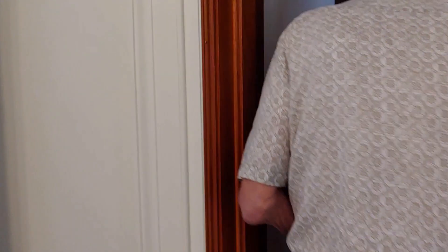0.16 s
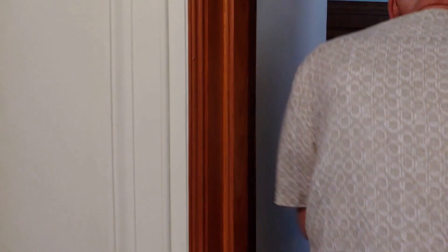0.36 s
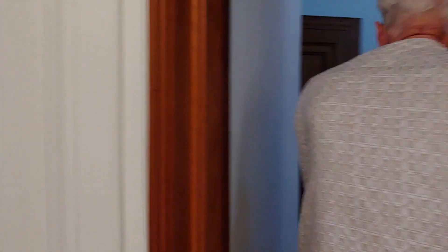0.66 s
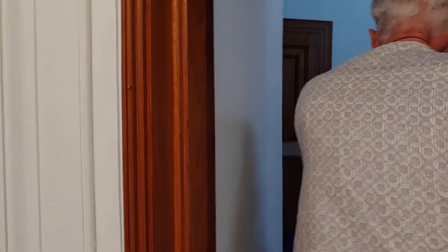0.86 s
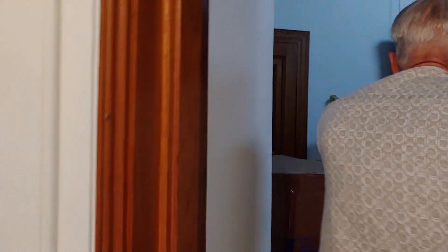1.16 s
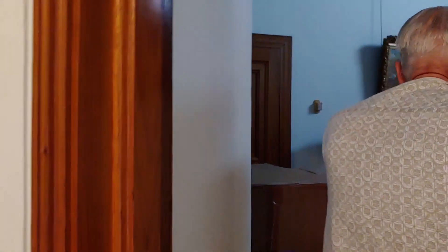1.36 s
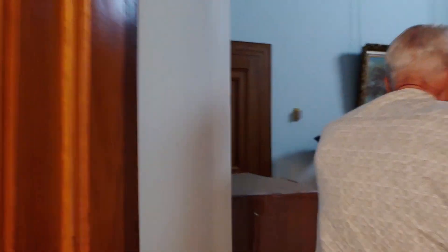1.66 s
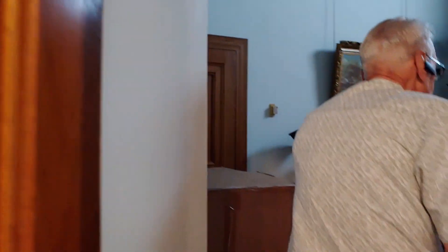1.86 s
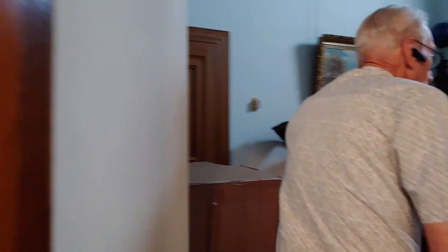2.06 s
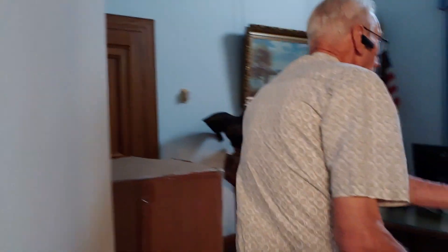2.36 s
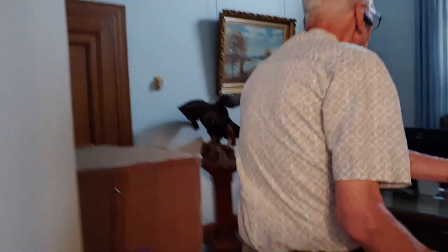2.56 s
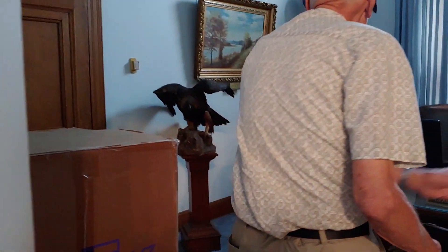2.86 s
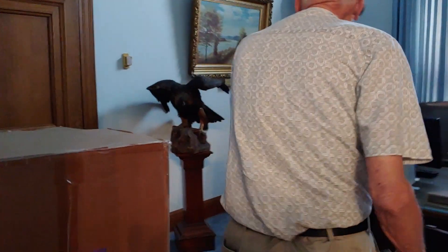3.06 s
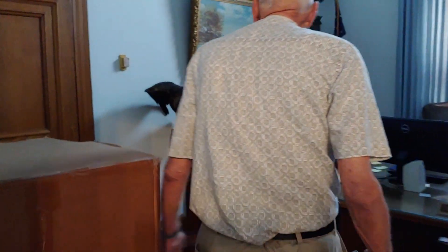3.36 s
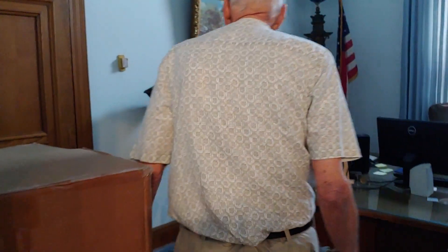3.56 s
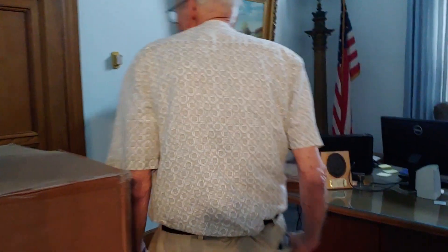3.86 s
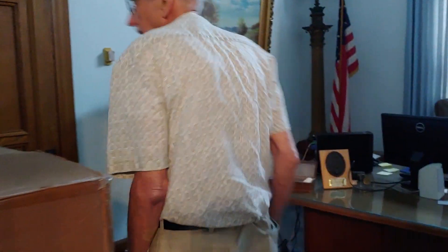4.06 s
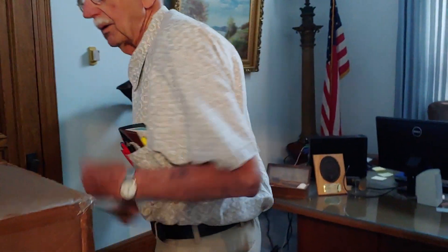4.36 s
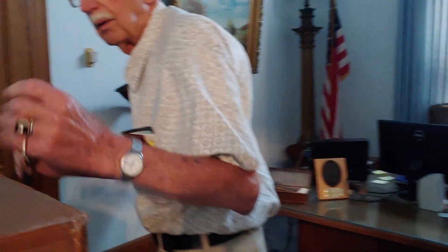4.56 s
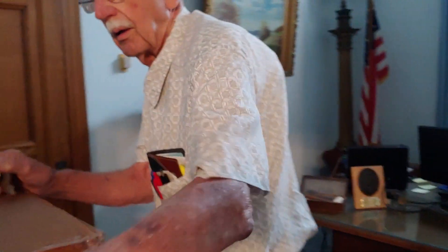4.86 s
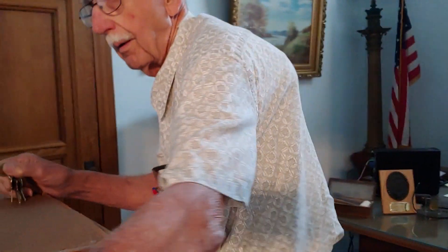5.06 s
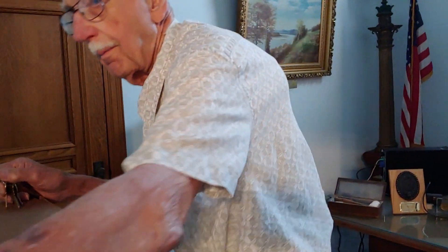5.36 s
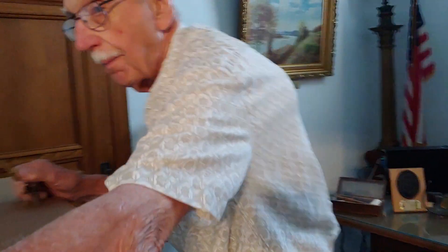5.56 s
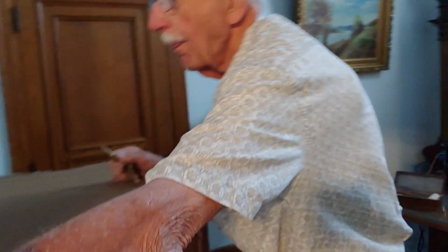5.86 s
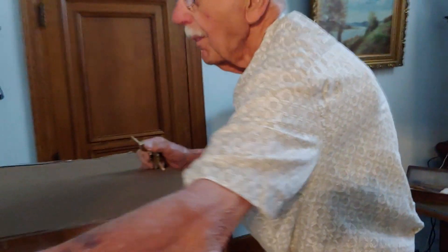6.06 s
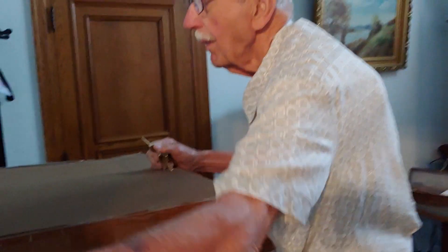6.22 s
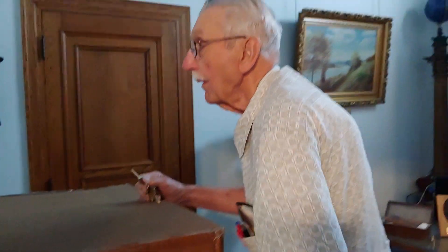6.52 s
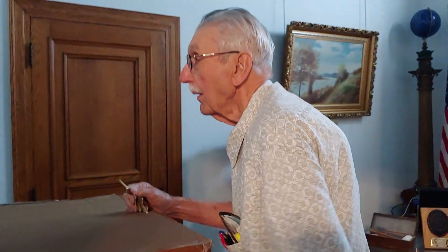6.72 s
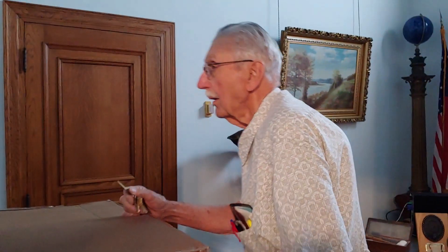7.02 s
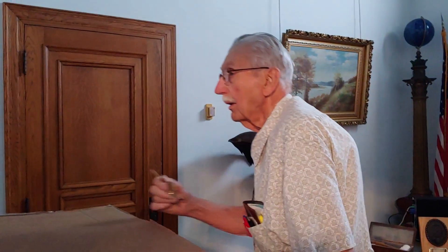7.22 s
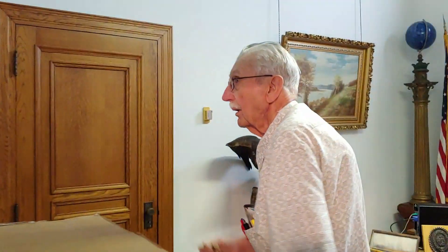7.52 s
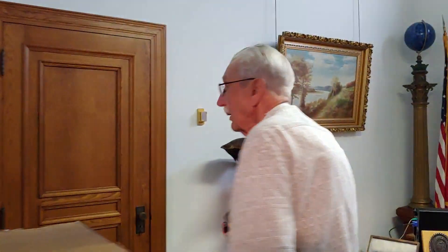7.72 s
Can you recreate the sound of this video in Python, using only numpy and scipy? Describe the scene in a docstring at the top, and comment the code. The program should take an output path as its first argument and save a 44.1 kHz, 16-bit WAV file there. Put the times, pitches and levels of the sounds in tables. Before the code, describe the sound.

Close hand-held microphone in a moderately live office. Cloth brushing, dull footfalls and a sharp clack come over low handling rumble. A panel bump leads to a loud wooden knock with scraping and key clinks. After quieter steps and a few jingles, the keys land on a cardboard box with a hollow thump and bright clatter. Small taps follow, then a metal snap and chatter, a faint squeak, and light final clinks.

```python
"""Soft brushing and light knocks come first, over low room noise and the rumble of a hand-held microphone.
Someone walks through a doorway into an office with a ring of keys, and sets it down on a cardboard box.
Footfalls and knocks are shaped noise bursts with a sung tone; cloth, hands and scrapes are grains of friction.
Door hardware, panel, furniture, box and keys ring in tables of decaying modes; a faint squeak comes late.
Diffuse reflections of the contacts, strokes and keys fill the room."""
import sys
import numpy as np
from scipy import signal
from scipy.fft import rfft, irfft, next_fast_len
from scipy.io import wavfile
from scipy.ndimage import uniform_filter1d

SR = 44100
rng = np.random.default_rng(int(sys.argv[2]) if len(sys.argv) > 2 else 0)


def transcribe(signal):
    """Save signal, clipped to [-1, 1], as a 16-bit WAV file at the path in sys.argv[1]."""
    frames = np.atleast_2d(signal).T
    limited = np.clip(frames, -1, 1)
    pcm = np.round(limited * 32767).astype(np.int16)
    wavfile.write(sys.argv[1], SR, pcm)


N = 347814


def from_db(db):
    """Decibels to gain."""
    return 10 ** (np.asarray(db) / 20)


def rms_one(x):
    """Scale to unit rms."""
    return x / np.sqrt(np.mean(x ** 2) + 1e-20)


def in_time(rows):
    """Interpolate each column of a curve, sample by sample."""
    times_s, *columns = np.transpose(rows)
    return [np.interp(np.arange(N) / SR, times_s, column) for column in columns]


def at_hz(points, hz):
    """Read a table on a log-frequency axis."""
    points_hz, values = np.transpose(points)
    return np.interp(np.log(np.maximum(hz, 1)), np.log(points_hz), values)


def band(x, edges_hz, kind, order=2):
    """Butterworth filter."""
    return signal.sosfilt(signal.butter(order, edges_hz, kind, fs=SR, output="sos"), x)


def add(out, start_s, sound):
    """Mix a sound in from start_s, clipped to the scene."""
    start = round(start_s * SR)
    sound = sound[max(-start, 0):max(N - start, 0)]
    out[max(start, 0):max(start, 0) + len(sound)] += sound


def ring(clicks, hz, t60_s):
    """Two-pole resonator: a unit click sets a sine of height 1 ringing."""
    radius = from_db(-60 / (t60_s * SR))
    angle = 2 * np.pi * hz / SR
    poles = [1, -2 * radius * np.cos(angle), radius * radius]
    return signal.lfilter([0, np.sin(angle)], poles, clicks + 1e-18)


def surges(depth_db, rate_hz):
    """A gain that swells and sinks at random: lowpassed noise, depth_db rms."""
    drift = band(rng.standard_normal(N + SR), rate_hz, "low")[SR:]
    return from_db(depth_db * rms_one(drift))


def struck(blows, modes, detune=0.0, uneven_db=4.5, attack_s=0.00027):
    """Every blow rings all modes of one object; strengths vary per blow, loose parts shift their tuning."""
    out = np.zeros(N)
    t = np.arange(int(.3 * SR)) / SR
    hz, mode_db, t60_s = np.transpose(modes)
    decays = from_db(-60 * t / t60_s[:, None]) * (1 - np.exp(-t / attack_s))
    for start_s, db in blows:
        strengths = from_db(db + mode_db + uneven_db * rng.standard_normal(len(hz)))
        tuned_hz = hz * (1 + detune * rng.standard_normal(len(hz)))
        cycles = tuned_hz[:, None] * t + rng.random((len(hz), 1))
        add(out, start_s, strengths @ (decays * np.sin(2 * np.pi * cycles)))
    return out


# Edges of the bass, middle, presence and treble bands [Hz].
BAND_EDGES_HZ = [180, 700, 2500, 7000, 13000]
PIVOT_HZ = 2000


def band_centres_hz():
    """Geometric centres of the four bands."""
    edges = np.array(BAND_EDGES_HZ)
    return np.sqrt(edges[1:] * edges[:-1])


def band_levels(spectrum_db, db, tilt_db):
    """The spectrum of a contact's kind, tilted about the pivot: a harder contact is brighter."""
    return db + np.array(spectrum_db) + tilt_db * np.log2(band_centres_hz() / PIVOT_HZ)


def colour(x, levels_db, top_db, ring_hz, ring_db, ring_q=3.9, near_db=-3.0, near_s=.009, count=7):
    """Causal filter: four band levels, one resonance, and the comb of echoes from surfaces close by."""
    size = 2 * next_fast_len(len(x) // 2 + 1024)
    hz = np.arange(size // 2 + 1) * SR / size
    density = np.array(levels_db) - 10 * np.log10(2 * np.diff(BAND_EDGES_HZ) / SR)
    # a sound that is already dulling keeps falling towards the top
    top = density[-1] + 1.6 * min(density[-1] - density[-2] + 6, 3)
    points = [(60, density[0] - 14), (170, density[0] - 3), *zip(band_centres_hz(), density),
              (11900, top - 3.5), (13200, top + top_db), (16000, top + top_db - 9.5)]
    plain_db = at_hz(points, hz)
    # the ring gathers the energy of its neighbourhood into a narrow peak
    octaves = np.log2(np.maximum(hz, 1) / ring_hz)
    peak = 1 / (1 + (2 * ring_q * (hz / ring_hz - 1)) ** 2)
    lift = peak - 0.34 * np.exp(-(octaves / 5.5) ** 2)
    # folding the cepstrum gives minimum phase
    cepstrum = irfft(np.log(from_db(plain_db + ring_db * lift)))
    cepstrum[1:size // 2] *= 2
    cepstrum[size // 2 + 1:] = 0
    # echoes are drawn anew for each contact, the latest at near_s
    lags_s = near_s * rng.uniform(.08, 1, count)
    strengths = from_db(near_db) * rng.choice([-1, 1], count) * np.exp(-lags_s / near_s)
    echoes = np.zeros(size)
    echoes[np.round(lags_s * SR).astype(int)] = strengths
    # long waves bend round small surfaces
    reflected = hz / (hz + 250)
    comb = (1 + reflected * rfft(echoes)) / np.sqrt(1 + reflected ** 2 * np.sum(strengths ** 2))
    return irfft(rfft(x, size) * np.exp(rfft(cepstrum)) * comb)


# Noise spectrum of the room air. Each row: frequency in Hz, relative density in dB.
AIR_SPECTRUM = [(60, 10), (150, 10.5), (300, 5), (700, 1), (1500, -3), (3500, -6.5), (8000, -8),
                (11500, -13), (13500, -21.5), (16000, -26)]
# Stir of the background. Each row: time in seconds, rms level in dB.
AIR_LEVEL = [(0, -52), (1.3, -49), (1.62, -55.5), (1.95, -47.5), (2.65, -48.5), (3.1, -52.5), (3.6, -51),
             (4.5, -54), (5.3, -46), (5.85, -58), (6.45, -53.5), (6.88, -54), (7.0, -54), (7.49, -59),
             (7.54, -40.5), (7.89, -41.5)]


def air(near_db=-5.5, count=8):
    """Soft noise of the room, rippled by reflections."""
    hz = np.arange(N // 2 + 1) * SR / N
    lags_s = rng.uniform(.002, .02, count)
    ripple = 1 + from_db(near_db) * sum(np.exp(-2j * np.pi * hz * lag) for lag in lags_s)
    spectrum = rfft(rng.standard_normal(N)) * from_db(at_hz(AIR_SPECTRUM, hz)) * ripple
    return from_db(in_time(AIR_LEVEL)[0]) * rms_one(irfft(spectrum, N))


# Reverberation of the office. Each row: frequency in Hz, t60 in seconds.
ROOM_T60 = [(150, .55), (1000, .52), (5000, .44), (8000, .32), (15000, .17)]


def office(x, first_s=0.00016, build_s=0.00024, count=10):
    """Diffuse reflections off plaster and wood: noise bands decay separately, the treble dies first."""
    t = np.arange(int(.7 * SR)) / SR
    edges_hz = np.geomspace(100, 17000, count + 1)
    tail = np.zeros(len(t))
    for low, high in zip(edges_hz, edges_hz[1:]):
        decay = from_db(-60 * t / at_hz(ROOM_T60, np.sqrt(low * high)))
        tail += band(rng.standard_normal(len(t)), [low, high], "band") * decay
    tail *= 1 - np.exp(-np.maximum(t - first_s, 0) / build_s)
    return signal.fftconvolve(x, tail / np.sqrt(np.sum(tail ** 2)))[:N]


def wobble(edges_hz, evenness):
    """A low, loosely tuned shaking whose swings are partly evened out."""
    shake = band(rng.standard_normal(N + SR), edges_hz, "band", order=3)
    swing = np.abs(signal.hilbert(shake, next_fast_len(len(shake))))[:len(shake)]
    even = shake / uniform_filter1d(swing, size=900) ** evenness
    return rms_one(band(even, 1.01 * edges_hz[1], "low", order=4)[SR:])


# Grip shifts on the microphone housing. Each row: start in seconds, relative level in dB.
BUMPS = [(.622, -9), (.68, -5), (.783, -0.5), (0.834, 5.5), (.964, 4), (1.072, -6), (1.095, 0), (1.168, 4),
         (1.309, 2.5), (1.461, -7), (1.556, -1)]
# Housing modes. Each row: nominal frequency in Hz, relative level in dB, t60 in seconds.
HOUSING_MODES = [(58.8, 0.5, 0.13), (126, -9.5, 0.065), (195, -18, 0.035)]
# Handling rumble. Each row: time in seconds, deep sway and upper shudder as relative levels in dB.
HANDLING = [(0.0, -49, -21.5), (0.07, -44, -20.5), (0.13, -40, -11.5), (0.17, -37, -11.5),
            (0.2, -21, -21.5), (0.31, -31.5, -38), (0.7, -7.5, -9.5), (0.74, -14, -13.5), (0.81, -8, -16),
            (1.38, -16.5, -12), (1.49, -10.5, -8), (1.95, -29.5, -40), (2.09, -25, -21), (2.17, -30.5, -32),
            (2.61, -28, -40), (2.7, -16, -30.5), (3.23, -37.5, -45.5), (3.4, -31.5, -28.5),
            (3.49, -17.5, -41), (3.62, -28, -35.5), (4.59, -29.5, -37), (4.7, -62, -38), (4.79, -31, -24.5),
            (4.92, -40, -37), (5.07, -31, -42), (5.27, -36, -39), (5.29, -17, -26), (5.34, -19, -41.5),
            (5.71, -15, -15), (5.95, -16, -42), (6.04, -28, -26.5), (6.41, -15, -26.5), (6.61, -27, -28.5),
            (6.68, -27, -15.5), (6.81, -15.5, -25.5), (7.07, -30.5, -24.5), (7.12, -74, -32.5),
            (7.18, -13.5, -44.5), (7.33, -26.5, -23), (7.6, -29, -36), (7.73, -31, -14.5), (7.89, -31, -34)]


def handling(sway_db=0.0, shudder_db=0.5, murmur_db=-28.0, bump_softness_hz=260):
    """The housing sways and shudders in the hand; shifts of the grip add dull bumps."""
    sway, shudder = from_db(in_time(HANDLING))
    out = from_db(sway_db) * sway * surges(depth_db=3.0, rate_hz=10.7) * wobble([27, 42], evenness=0.85)
    out += from_db(shudder_db) * shudder * surges(depth_db=3.0, rate_hz=7.2) * wobble([52, 83], evenness=0.63)
    out += from_db(murmur_db) * shudder * rms_one(band(rng.standard_normal(N), [80, 140], "band"))
    bumps = struck(BUMPS, HOUSING_MODES, detune=0.059, uneven_db=0.0, attack_s=0.0059)
    return out + band(bumps + 1e-18, bump_softness_hz, "low", order=3)


# A faint thin squeak. Each row: time in seconds, pitch in Hz, relative level in dB.
SQUEAK = [(6.46, 3365, -81), (6.49, 3365, -54), (6.53, 3290, -57), (6.56, 3370, -57), (6.63, 3330, -56),
          (6.655, 3410, -45), (6.69, 3430, -57), (6.8, 3400, -57), (6.9, 3350, -74)]
# Its partials. Each row: multiple of the pitch, relative level in dB.
SQUEAK_PARTIALS = [(.93, -9.5), (1, -3), (1.275, -14.5), (1.46, -17)]


def squeak(waver=.007, waver_hz=160, flutter_db=5.0):
    """A thin tone of a few weak partials; each wavers in pitch and flutters in level on its own."""
    hz, db = in_time(SQUEAK)
    out = np.zeros(N)
    for ratio, partial_db in SQUEAK_PARTIALS:
        drift = rms_one(band(rng.standard_normal(N), waver_hz, "low"))
        partial_hz = ratio * hz * (1 + waver * drift)
        level = from_db(db + partial_db) * surges(depth_db=flutter_db, rate_hz=23)
        out += level * np.sin(2 * np.pi * np.cumsum(partial_hz) / SR)
    return out


def friction_strokes(rows, spectrum_db, ring_db, slips_per_s, spread_db, smooth_share,
                     fall_ratio=0.93, top_db=-21.5, judder_hz=70, ring_q=5.3):
    """Surfaces catch and slip in tiny grains over a smooth hiss; each stroke swells, judders and fades."""
    out = np.zeros(N)
    t = np.arange(N) / SR
    sizes = from_db(spread_db * np.minimum(rng.exponential(1, N), 3)) * rng.choice([-1, 1], N)
    slips = rms_one(sizes * (rng.random(N) < slips_per_s / SR))
    judder = from_db(2.2 * rms_one(band(rng.standard_normal(N), judder_hz, "low")))
    hiss = rng.standard_normal(N)
    friction = rms_one(judder * (np.sqrt(1 - smooth_share) * slips + np.sqrt(smooth_share) * hiss))
    for peak_s, width_s, db, tilt_db, ring_hz in rows:
        levels_db = band_levels(spectrum_db, db, tilt_db)
        rise_s, fall_s = width_s / fall_ratio, width_s * fall_ratio
        span = (t > peak_s - 4 * rise_s) & (t < peak_s + 4 * fall_s)
        since_s = t[span] - peak_s
        stroke = np.exp(-np.abs(since_s / np.where(since_s < 0, rise_s, fall_s)) ** 2.03)
        grains = np.roll(friction, rng.integers(N))[span]
        # a stroke with more treble also reaches higher
        reach_db = top_db + .6 * (levels_db[-1] + 39.0)
        add(out, t[span][0], colour(stroke * grains, levels_db, reach_db, ring_hz, ring_db, ring_q, near_db=-1.0))
    return out


# Cloth and hands brushing. Each row: peak in seconds, mean of rise and fall width in seconds,
# relative level in dB, tilt in dB per octave, ring in Hz.
RUBS = [(.01, 0.025, -34.5, 0.5, 523), (.18, 0.11, -43, 2.5, 2630), (.398, 0.018, -23.5, -1, 225),
        (.53, 0.074, -44, 2.5, 586), (.78, 0.059, -34.5, 1, 4200), (1.115, 0.07, -35, 0.5, 1770),
        (1.438, 0.02, -33, -0.5, 735), (1.718, 0.021, -31, -1, 690), (2.092, 0.033, -24.5, 3.5, 12900),
        (2.372, 0.021, -29, 0, 323), (2.785, 0.035, -34.5, 4, 10400), (3.016, 0.023, -36.5, 0, 1580),
        (3.09, 0.029, -51, 1.5, 1200), (3.158, 0.018, -36, -1, 815), (3.27, 0.087, -46.5, -3, 244),
        (3.921, 0.026, -30, -2.5, 820), (4.015, 0.033, -41, 0, 700), (4.28, 0.096, -32.5, 0, 1120),
        (4.376, 0.021, -37, 2.5, 1120), (4.625, 0.021, -24, -1, 348), (4.877, 0.015, -21.5, -0.5, 338),
        (5.02, 0.12, -36.5, 0, 473), (5.12, 0.048, -39, -5, 247), (5.36, 0.044, -29.5, -0.56, 316),
        (5.63, 0.067, -48, -4, 1980), (5.785, 0.047, -45.5, -4, 760), (5.965, 0.058, -37, 1, 2550),
        (7.176, 0.027, -31.5, 3, 9600), (6.74, 0.11, -55.5, 4, 4930), (7.545, 0.04, -44, -2, 5530),
        (7.603, 0.031, -31, 0.1, 1270), (7.68, 0.067, -43.5, -2, 1390)]
# Bass, middle, presence and treble levels [dB].
RUB_DB = (-2, -3, 0, -7)


def rubs():
    """Cloth and hands: dense, nearly equal slips with much smooth hiss."""
    return friction_strokes(RUBS, RUB_DB, ring_db=8.5, slips_per_s=500, spread_db=1.1, smooth_share=0.45)


# Hard things sliding over wood and cardboard. Each row: peak in seconds, mean of rise and fall width
# in seconds, relative level in dB, tilt in dB per octave, ring in Hz.
SCRAPES = [(.94, 0.028, -33.5, 0.5, 1830), (1.8, 0.08, -36.5, -8.5, 750), (2.092, 0.049, -17.5, 1.5, 2120),
           (3.803, 0.019, -28.5, -1.5, 3300), (3.98, 0.068, -30, -5, 780), (4.21, 0.1, -36, 2.5, 990),
           (5.112, 0.075, -29.5, -9, 860), (6.182, 0.03, -24, 1, 8240), (6.255, 0.037, -33, -1, 5380),
           (7.806, 0.022, -30, -4.5, 1430)]
# Bass, middle, presence and treble levels [dB].
SCRAPE_DB = (-18.5, -2.5, -4.5, -16)


def scrapes():
    """Hard sliding: sparser slips with little smooth hiss."""
    return friction_strokes(SCRAPES, SCRAPE_DB, ring_db=5.0, slips_per_s=320, spread_db=-1.5, smooth_share=0.14)


# Sliding contacts that catch and sing. Each row: peak in seconds, width in seconds, relative level in dB,
# four resonances in Hz, strongest first.
RASPS = [(.8, 0.088, -47, 2840, 1770, 3400, 3900), (1.135, 0.074, -50.5, 2680, 3320, 1810, 5400),
         (1.715, 0.014, -35.5, 1990, 5600, 3070, 3640), (2.097, 0.039, -29, 2246, 1450, 1040, 5820),
         (2.376, 0.024, -32.5, 1820, 1570, 6360, 3120), (2.785, 0.028, -39.5, 6970, 9600, 5120, 1880),
         (3.805, 0.013, -30, 3260, 3520, 820, 2450), (3.983, 0.013, -28.5, 804, 480, 1415, 2010),
         (4.185, 0.051, -42.5, 3670, 2060, 3180, 970), (4.285, 0.06, -37.5, 1080, 2106, 2880, 4950),
         (4.376, 0.016, -39, 1955, 1090, 3670, 4600), (6.189, 0.018, -24.5, 4320, 6460, 5080, 7600),
         (6.245, 0.037, -37.5, 5500, 4420, 5660, 2380), (7.183, 0.032, -68, 4640, 2720, 3940, 3240),
         (7.808, 0.016, -38, 3010, 1790, 2430, 1080)]


def rasps(slips_per_s=420, spread_db=4.0, step_db=-3.0, t60_s=0.046):
    """Tiny slips under a swelling stroke keep the narrow resonances of the rubbed thing ringing."""
    out = np.zeros(N)
    t = np.arange(int(.4 * SR)) / SR - .2
    for peak_s, width_s, db, *modes_hz in RASPS:
        sizes = from_db(spread_db * np.minimum(rng.exponential(1, len(t)), 3)) * rng.choice([-1, 1], len(t))
        stroke = np.exp(-(t / width_s) ** 2)
        slips = stroke * sizes * (rng.random(len(t)) < slips_per_s / SR)
        sung = np.zeros(len(t))
        for k, hz in enumerate(modes_hz):
            sung += from_db(db + k * step_db) * rms_one(ring(slips, hz, t60_s)) * (-1) ** k
        add(out, peak_s + t[0], band(sung, min(modes_hz) / 2, "high") * np.sqrt(np.mean(stroke ** 2)))
    return out


# Small loose objects nudged. Each row: start in seconds, relative level in dB, t60 in seconds,
# four modes in Hz, strongest first.
TINKS = [(0.524, -20, 0.031, 1047, 397, 1780, 3670), (0.759, -17, 0.044, 1624, 2990, 3300, 2120),
         (2.437, -34, 0.046, 1350, 5879, 5373, 1770), (2.530, -30.5, 0.066, 1800, 3220, 3720, 1335),
         (3.007, -28.5, 0.042, 1360, 1000, 1770, 2690), (3.198, -31, 0.074, 1530, 1890, 1760, 2320),
         (5.614, -24, 0.019, 1930, 3740, 4170, 3070), (5.914, -31, 0.2, 4290, 2210, 5960, 7300)]


def tinks(step_db=-5.0):
    """Each small object rings in a few modes, nominally each weaker than the one before."""
    out = np.zeros(N)
    for start_s, db, t60_s, *modes_hz in TINKS:
        modes = [(hz, k * step_db, t60_s) for k, hz in enumerate(modes_hz)]
        out += struck([(start_s, db)], modes)
    return out


# Knocks on hollow furniture. Each row: start in seconds, relative level in dB.
CABINET_BLOWS = [(2.529, -26), (2.562, -46), (2.607, -37), (3.007, -35)]
# Its modes. Each row: frequency in Hz, relative level in dB, t60 in seconds.
CABINET_MODES = [(257.3, 1.5, 0.16), (295, 3.5, 0.15), (359, -7, 0.1), (1320, -19, 0.33)]


def cabinet():
    """A hollow piece of furniture is knocked and rings, with a softened onset."""
    return struck(CABINET_BLOWS, CABINET_MODES, attack_s=0.0023)


# Bump and rattle of a wooden panel. Each row: start in seconds, relative level in dB.
PANEL_BLOWS = [(1.7626, -21.5), (1.769, -23.5), (1.79, -30.5), (1.807, -46), (1.835, -35), (1.845, -31),
               (1.878, -45)]
# Its modes. Each row: frequency in Hz, relative level in dB, t60 in seconds.
PANEL_MODES = [(427, -7, 0.12), (690, -3, 0.1), (790, -20, 0.09), (960, 3.5, 0.038), (1090, -8.5, 0.13),
               (1373, -4, 0.06), (1678, -5, 0.067), (1980, -4, 0.045), (2283, -5.5, .04)]


def panel():
    """A wooden panel is bumped and rattles: repeated blows on fixed modes."""
    return struck(PANEL_BLOWS, PANEL_MODES)


# Snap and chatter of a metal latch. Each row: start in seconds, relative level in dB.
LATCH_BLOWS = [(6.184, -9.5), (6.189, -14), (6.199, -21), (6.208, -25), (6.222, -26), (6.243, -25),
               (6.2668, -26.5), (6.297, -36), (6.327, -45)]
# Its modes. Each row: nominal frequency in Hz, relative level in dB, t60 in seconds.
LATCH_MODES = [(1656, -4.5, 0.05), (1850, -3.5, 0.019), (2200, -3.5, 0.041), (2650, -12.5, 0.12),
               (3280, -9, 0.067), (4400, -20, 0.083), (4600, -14, 0.118), (5050, -9, 0.12),
               (5650, -22, 0.097), (5800, -17, 0.058), (6121, -14, .1), (7000, -18, 0.026),
               (8030, -11, 0.057), (8400, -21, 0.1)]


def latch():
    """A metal latch snaps and chatters; its loose parts retune at each blow."""
    return struck(LATCH_BLOWS, LATCH_MODES, detune=0.035)


def contacts(rows, spectrum_db, ring_db, crack, attack_s, crack_s=0.00051, top_db=-22.5,
             push_hz=800, push_db=0.0, softening=0.016, ringing_s=0.072):
    """Low modes are pushed as one while dense high modes crack and die; gives direct sound and room feed."""
    direct, spread = np.zeros((2, N))
    t = np.arange(int(.25 * SR)) / SR
    push = band(signal.unit_impulse(len(t)) + 1e-18, push_hz, "low")
    for start_s, db, tilt_db, t60_s, ring_hz, _ in rows:
        levels_db = band_levels(spectrum_db, db, tilt_db)
        # a duller knock is a softer contact, which takes longer to build up
        dullness_db = max(levels_db) - levels_db[-1]
        rise_s = attack_s * np.exp(softening * min(dullness_db, 30))
        decay = from_db(-60 * t / t60_s) + crack * np.exp(-t / crack_s)
        shape = decay * (1 - np.exp(-t / rise_s))
        burst = shape * rng.standard_normal(len(t)) / np.sqrt(np.mean(shape[t < .005] ** 2))
        thinned = burst - .5 * band(burst, push_hz, "low", order=1)
        blow = thinned + from_db(push_db) * np.linalg.norm(burst) * push
        # short snaps are close and dry; long knocks come from large things that fill the room
        size_db = np.clip(14 * np.log10(t60_s / ringing_s), -9, 2)
        knock = colour(blow, levels_db, top_db, ring_hz, ring_db, near_db=size_db - 2.0)
        add(direct, start_s, knock)
        add(spread, start_s, from_db(size_db) * knock)
    return np.array([direct, spread])


def hollows(rows, t60_s, attack_s=0.0048):
    """Each struck panel or fitting sings briefly in its strongest mode."""
    out = np.zeros(N)
    t = np.arange(int(.4 * SR)) / SR
    for start_s, db, _, _, hz, sing_db in rows:
        envelope = from_db(db + sing_db - 60 * t / t60_s) * (1 - np.exp(-t / attack_s))
        add(out, start_s, envelope * np.sin(2 * np.pi * hz * t))
    return out


# Footfalls and soft things set down. Each row: start in seconds, relative level in dB, tilt in dB per octave,
# t60 of the noise in seconds, ring in Hz, sung tone against the blow in dB.
THUDS = [(.1613, -30, 8, 0.064, 292, -9.5), (.456, -20, -1, 0.059, 993, -13),
         (.523, -27, -1.5, 0.064, 575, -4), (.621, -42.5, -6, 0.014, 600, -7),
         (.6933, -26.5, 0, 0.056, 277, -3), (1.7015, -23, 0.5, 0.06, 547, -19),
         (1.766, -40, -2.5, 0.068, 178, 18.5), (2.529, -39, 2, 0.11, 288, 6),
         (3.007, -29, 1, 0.052, 260, 3), (3.196, -41.5, -8.5, 0.079, 450, 3),
         (3.199, -45.5, 4, 0.088, 244, 19), (3.2445, -25.5, 0, 0.067, 243, -8),
         (3.986, -43.5, -2, 0.082, 181, 19.5), (4.772, -28.5, -0.5, 0.092, 388, 0),
         (4.988, -21, -2.5, 0.09, 352, -12), (4.999, -21, -3, 0.13, 345, -8.5),
         (6.502, -57.5, -7, 0.059, 463, -6)]
# Bass, middle, presence and treble levels [dB].
THUD_DB = (-2.5, -5, -6, -21)


def thuds():
    """Bass-heavy contacts: direct sound, room feed and sung tone."""
    return np.vstack([contacts(THUDS, THUD_DB, ring_db=11.0, crack=4.1, attack_s=0.00023),
                      hollows(THUDS, t60_s=0.17)])


# Knocks on wood and cardboard. Each row: start in seconds, relative level in dB, tilt in dB per octave,
# t60 of the noise in seconds, ring in Hz, sung tone against the blow in dB.
KNOCKS = [(.088, -38, 3.5, 0.04, 1560, 0), (.25, -32.5, 8.5, 0.054, 1640, -28),
          (.444, -29, 8, 0.013, 1810, -32), (1.7626, -36, -1, 0.04, 970, -22),
          (1.844, -30, 0, 0.066, 702, -14), (2.019, -29.5, -4, 0.055, 1730, -7),
          (2.054, -32, 9, .08, 427, 8), (2.072, -9, 3, 0.059, 1500, -15), (2.0857, -9.5, 3, 0.12, 1017, -7),
          (2.119, -16, 0.5, 0.064, 1185, -21), (2.4365, -26, 2, 0.06, 1350, -12),
          (2.476, -38.5, -4, 0.067, 264, 2), (2.530, -38, 7.5, 0.1, 1330, 2.5),
          (2.797, -33, 4, 0.15, 830, -9), (5.051, -46, 5, .015, 900, -10),
          (5.0645, -20.5, -8, 0.015, 1375, -4), (5.102, -35, -7, 0.016, 1000, -4),
          (5.112, -33, -3, 0.022, 1390, -14), (5.125, -31, 3.5, 0.022, 1620, -8),
          (5.145, -29, 2, 0.015, 764, -17), (5.206, -34, -1, 0.026, 890, -14),
          (5.491, -45, -8, 0.029, 1730, -17), (5.6128, -31, 1.5, 0.046, 1890, -15),
          (5.914, -34.5, 13, 0.047, 714, 12.5), (6.143, -32.5, -8.5, 0.22, 580, -4.5),
          (7.4972, -46, -10.5, 0.2, 855, -18), (7.790, -23, -1, 0.23, 920, -17)]
# Bass, middle, presence and treble levels [dB].
KNOCK_DB = (-30.5, -1, -8, -21.5)


def knocks():
    """Mid-heavy contacts with a strong resonance: direct sound, room feed and sung tone."""
    return np.vstack([contacts(KNOCKS, KNOCK_DB, ring_db=15.5, crack=2.2, attack_s=0.00037),
                      hollows(KNOCKS, t60_s=0.18)])


# Clacks of door hardware and other metal. Each row: start in seconds, relative level in dB, tilt in dB
# per octave, t60 of the noise in seconds, ring in Hz, sung tone against the blow in dB.
CLACKS = [(.7538, -6.5, 1.5, 0.015, 2610, -25), (.757, -17, -7, 0.18, 1940, -24.5),
          (1.3064, -45, 4.5, 0.1, 3940, -16), (2.086, -23.5, 5, 0.062, 2060, 8),
          (4.8655, -17.5, -4, 0.0084, 1860, -21), (4.8745, -25, 1, .007, 3200, -23),
          (4.8965, -28, -1.5, 0.007, 3070, -24), (4.9885, -25, 2.5, 0.01, 7400, -25),
          (5.0652, -32, 1.5, 0.0064, 9200, -16), (5.3167, -25, 2, 0.037, 8100, -6),
          (5.4016, -34, 7.5, 0.069, 3730, -7), (5.9136, -14, 4.5, 0.013, 2730, -11),
          (5.927, -19, 4, 0.028, 7840, -12), (6.184, -12, -2, 0.11, 1682, -2),
          (6.189, -18, 1.5, 0.031, 6760, -13), (6.199, -19, -4, 0.12, 5270, -14),
          (6.2105, -24, 1, 0.013, 5100, -15), (6.2662, -19, -7, 0.013, 3040, -7),
          (6.326, -37, -2, .012, 5500, -15), (7.547, -53, 9, .014, 6040, -14),
          (7.5628, -38, 7, .012, 11800, -4)]
# Bass, middle, presence and treble levels [dB].
CLACK_DB = (-39.5, -15.5, -3.5, -11.5)


def clacks():
    """Bright, quick contacts: direct sound, room feed and sung tone."""
    return np.vstack([contacts(CLACKS, CLACK_DB, ring_db=12.5, crack=2.3, attack_s=0.00017),
                      hollows(CLACKS, t60_s=0.13)])


# The hand with the keys lands on the box. Each row: start in seconds, relative level in dB.
BOX_BLOWS = [(4.866, 1), (4.8718, -23), (4.886, -6), (4.999, -15), (5.063, -18)]
# Box modes. Each row: frequency in Hz, relative level in dB, t60 in seconds.
BOX_MODES = [(110.4, -9, 0.048), (134, -4.5, 0.092), (192, -11, 0.064), (331, -8.5, 0.1), (707, -20, 0.05),
             (902, -13.5, 0.029)]


def box(softness_hz=1500):
    """A soft blow sets the cardboard panels booming briefly."""
    blows = np.zeros(N)
    for start_s, db in BOX_BLOWS:
        add(blows, start_s, from_db([db]))
    blows = band(blows + 1e-18, softness_hz, "low")
    return sum(from_db(db) * ring(blows, hz, t60_s) * (-1) ** k for k, (hz, db, t60_s) in enumerate(BOX_MODES))


# Flicks of a small key against the ring. Each row: start in seconds, relative level in dB.
SMALL_KEY_BLOWS = [(3.717, -22), (4.8645, -35), (4.875, -18)]
# Its modes. Each row: frequency in Hz, relative level in dB, t60 in seconds.
SMALL_KEY_MODES = [(4000, -9, .04), (4270, -6.5, .04), (4760, -18, .04), (7400, -5, 0.04),
                   (8200, -1.5, 0.06), (8900, -4.5, .05), (9400, -7, .12), (10050, 2, .04),
                   (10000, -6, 0.03), (11240, -6.5, .28), (11800, -15.5, .12)]


def small_key():
    """A small key is flicked against the ring and sounds its fixed modes."""
    return struck(SMALL_KEY_BLOWS, SMALL_KEY_MODES, uneven_db=-0.8)


# Bounces of a long key. Each row: start in seconds, relative level in dB.
LONG_KEY_BLOWS = [(4.8985, -5), (4.917, -36), (4.931, -29), (4.999, -31)]
# Its modes. Each row: frequency in Hz, relative level in dB, t60 in seconds.
LONG_KEY_MODES = [(6760, 1, .038), (6790, -23, .35), (10745, -14, .1), (10995, -14, .28),
                  (11068, -14.5, .27), (11600, -19, .12), (11900, -7, .04), (12771, -17, .17)]


def long_key():
    """A long key swings free, bounces and rings out in its fixed modes."""
    return struck(LONG_KEY_BLOWS, LONG_KEY_MODES, uneven_db=-2.0)


# Key against key. Each row: start in seconds, relative level in dB, added level of the low modes in dB.
CLINKS = [(2.052, -19, -10), (2.07, -10, -15), (2.082, -7, -18), (2.095, -20, -9), (2.107, -23, -16),
          (2.126, -20, -16), (2.183, -36, -14), (2.276, -41, -1), (2.529, -26.5, -20), (3.421, -43, -24),
          (3.470, -37, -3), (3.717, -12, -6), (4.016, -38, 1), (4.393, -29.5, -17), (4.523, -34.5, -32),
          (4.8639, -9.5, 4), (4.875, -10, -4), (4.890, -10, -3), (4.898, -10, -10), (4.905, -14.5, -11),
          (4.917, -16, -14), (4.931, -14, -12), (4.944, -29, -3), (4.949, -12.5, 4), (4.988, -23, 2),
          (4.997, -12.5, 2), (5.065, -20, 4.5), (5.247, -36, 2), (5.3166, -23.5, -10), (5.401, -28, -14),
          (7.4416, -46.5, -3), (7.546, -28, -10), (7.5617, -25.5, -17)]
# Key modes. Each row: nominal frequency in Hz, relative level in dB, t60 in seconds.
KEY_MODES = [(4030, -27, 0.054), (4910, -20.5, 0.097), (6490, -7, 0.064), (7230, -25, .22),
             (7500, -19, 0.091), (7500, -12.5, 0.21), (8000, -12.5, 0.087), (9660, -34, .07),
             (8900, -13.5, 0.086), (9540, -6.5, 0.048), (10970, -2.5, 0.041), (11500, -21.5, 0.1),
             (10640, -10.5, 0.028), (12600, -22.5, 0.21), (12600, -24, 0.033), (12600, -32, 0.139)]


def keys(rebound_db=-4.5, uneven_db=1.0, tick_db=4.0, level_db=-9.0, low_modes_hz=8500,
         attack_s=0.00026, count=4):
    """A touch rings one key; its rebounds strike the neighbours, which are tuned a little differently."""
    out = np.zeros(N)
    t = np.arange(int(.17 * SR)) / SR
    hz, mode_db, t60_s = np.transpose(KEY_MODES)
    decays = from_db(-60 * t / t60_s[:, None])
    onset = 1 - np.exp(-t / attack_s)
    for touch_s, db, low_db in CLINKS:
        for k in range(count):
            tuning = 1 + (.04 if k else .008) * rng.standard_normal(len(hz))
            uneven = uneven_db * rng.standard_normal(len(hz))
            strengths = from_db(mode_db + low_db * (hz < low_modes_hz) + uneven)
            cycles = (hz * tuning)[:, None] * t + rng.random((len(hz), 1))
            chime = strengths @ (decays * np.sin(2 * np.pi * cycles))
            # the contact itself is a short bright tick
            tick = band(rng.standard_normal(len(t)) * np.exp(-t / 0.0021), [4200, 12500], "band")
            add(out, touch_s, from_db(db + k * rebound_db) * (chime + from_db(tick_db) * tick) * onset)
            touch_s += rng.uniform(0.003784, 0.0088)
    return from_db(level_db) * out


def scene(knock_room_db=-9.5, hollow_room_db=-19.5, rub_room_db=-12.5, key_room_db=-10.0,
          box_room_db=-18.0, rub_db=-2.0):
    """All sources; contacts, rings, strokes, keys and box each have their own share of the room."""
    hits, spread, sung = thuds() + knocks() + clacks()
    rings = sung + panel() + latch() + tinks() + cabinet()
    strokes = from_db(rub_db) * (rubs() + scrapes()) + rasps() + squeak()
    jangle = keys() + long_key() + small_key()
    boom = box()
    room = office(from_db(knock_room_db) * spread + from_db(hollow_room_db) * rings
                  + from_db(rub_room_db) * strokes + from_db(key_room_db) * jangle
                  + from_db(box_room_db) * boom)
    return (hits + rings + strokes + jangle + boom + room + handling() + air())[None]


CUTOFF_HZ = 15900


def record(dry):
    """The largest swings are rounded off at full scale, and the top is cut."""
    rounded = dry / (1 + dry ** 6) ** (1 / 6)
    return signal.sosfilt(signal.ellip(10, .1, 90, CUTOFF_HZ, fs=SR, output="sos"), rounded)


dry = scene()
out = record(dry)
transcribe(out)
```